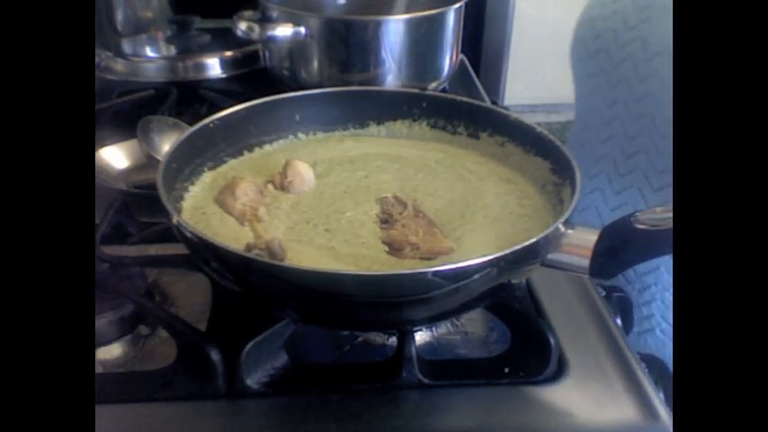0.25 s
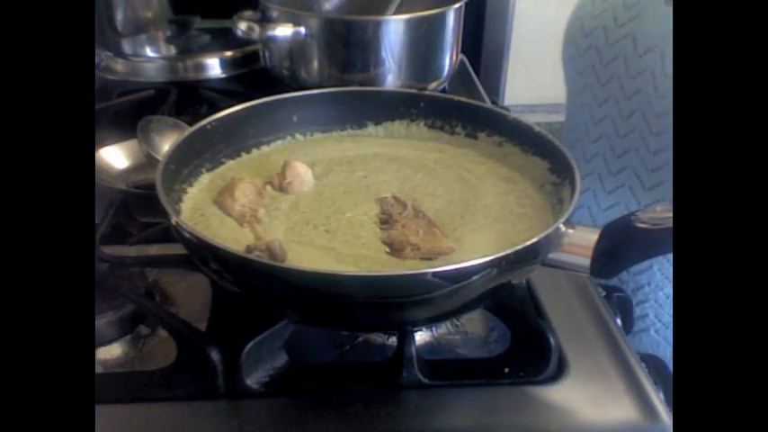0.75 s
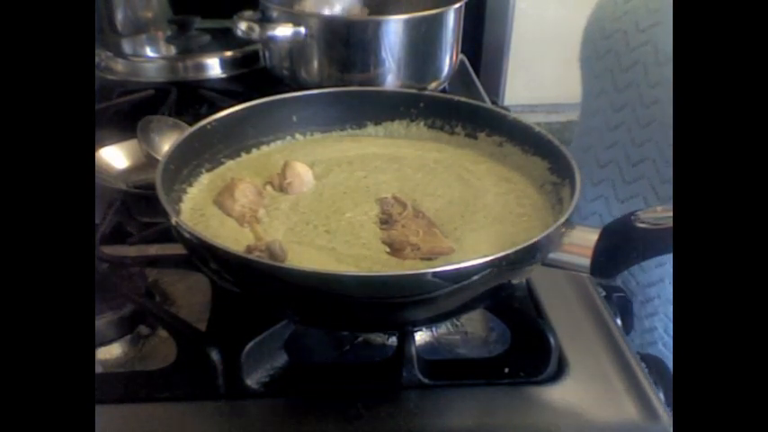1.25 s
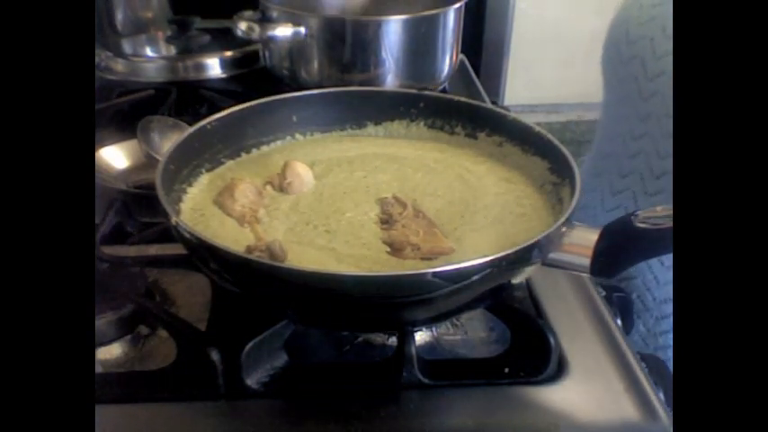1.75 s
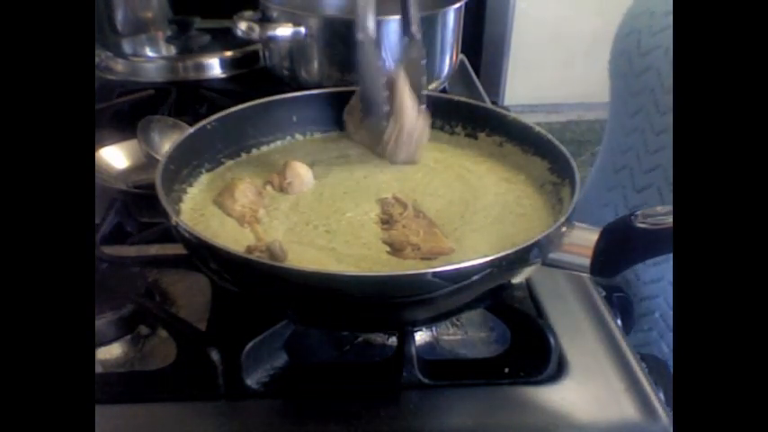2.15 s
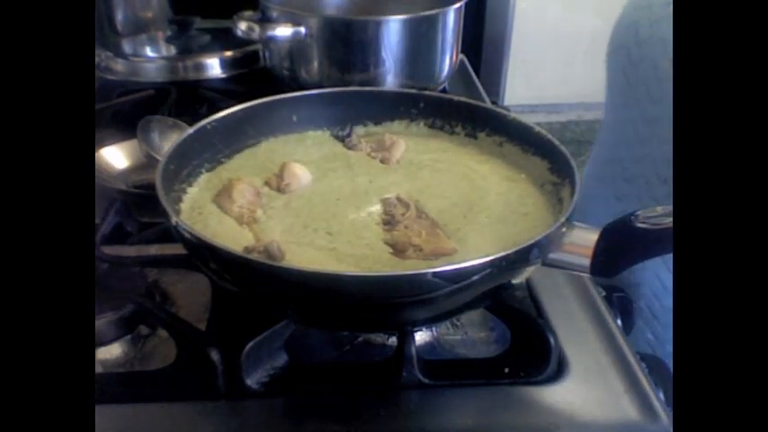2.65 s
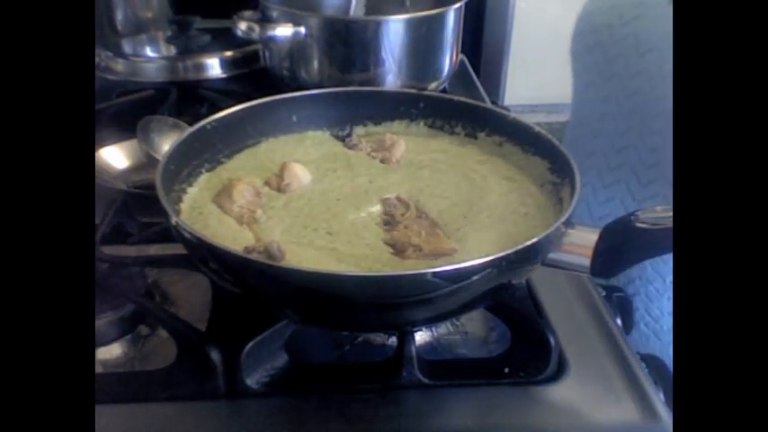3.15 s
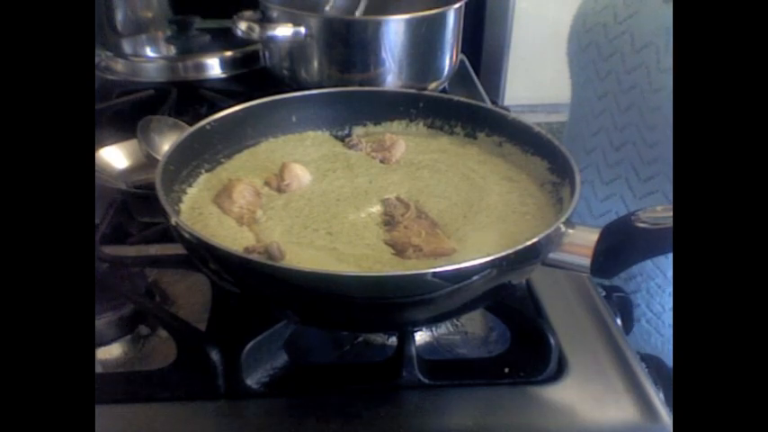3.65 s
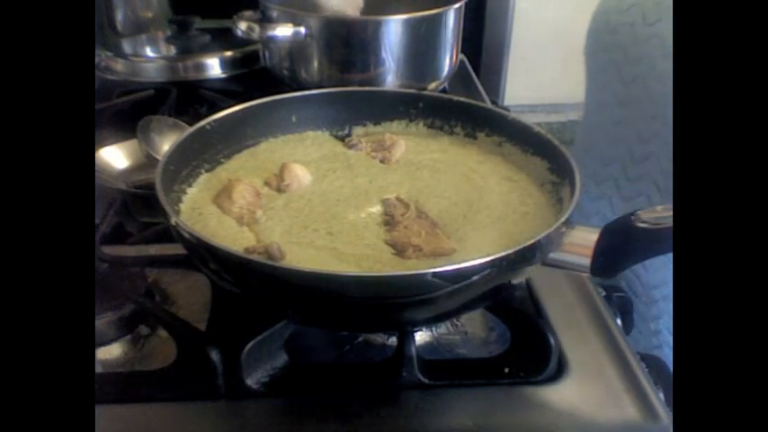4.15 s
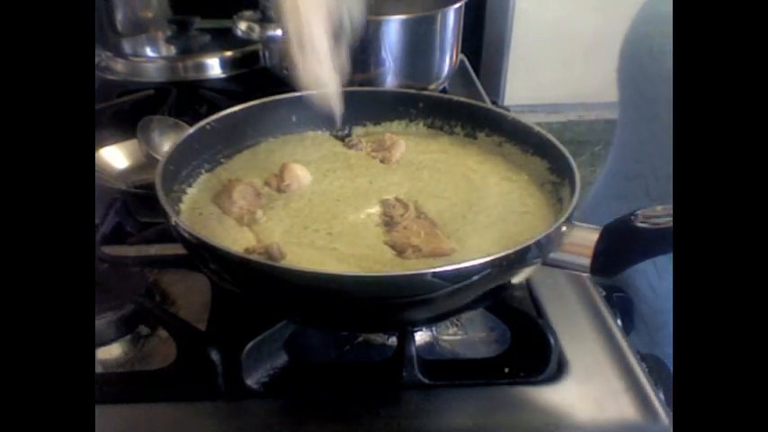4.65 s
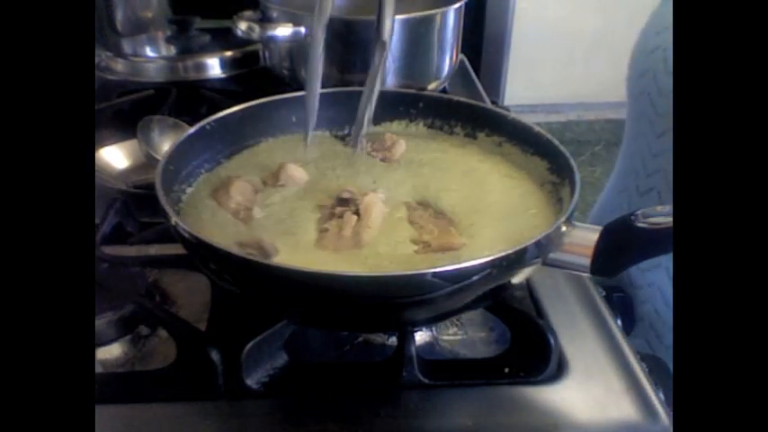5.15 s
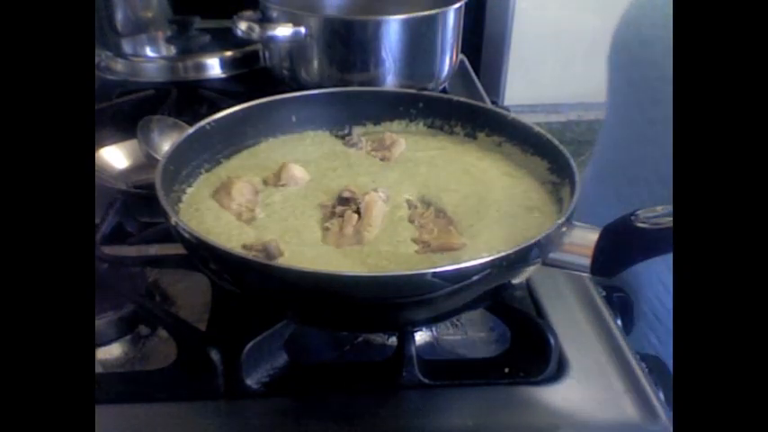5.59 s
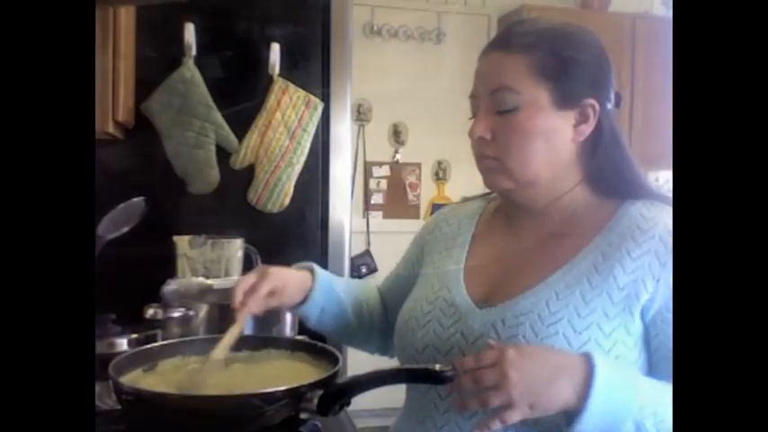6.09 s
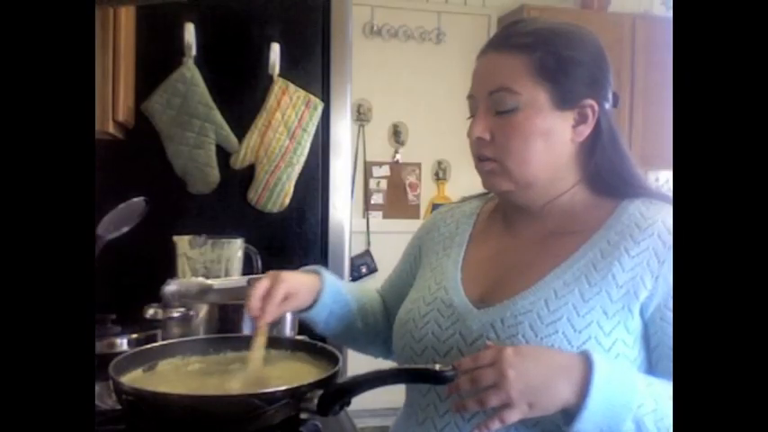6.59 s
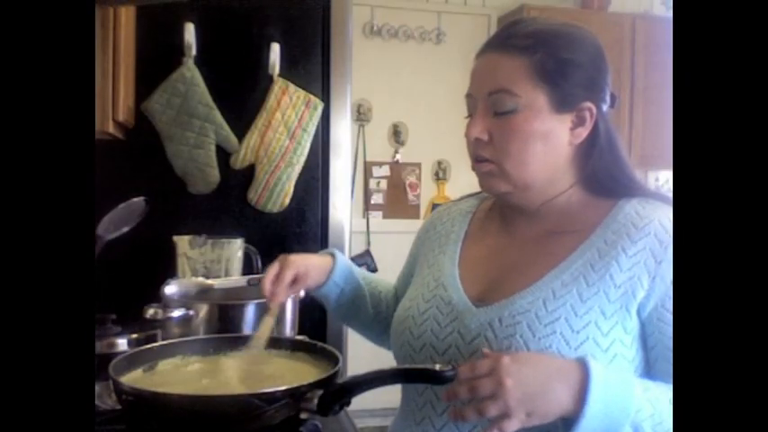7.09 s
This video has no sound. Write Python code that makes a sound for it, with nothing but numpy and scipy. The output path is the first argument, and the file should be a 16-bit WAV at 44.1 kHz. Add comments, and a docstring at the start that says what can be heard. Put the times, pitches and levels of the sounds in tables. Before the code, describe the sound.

A steady low appliance hum and soft room air fill a kitchen, with a thin electronic whine fluttering very fast. Against it, tongs clank on a metal pan with short rings, first with a little scrape, later with a rougher one and several light touches. Dull bumps and tiny ticks fill the gaps. Near the end two clanks fall as the background cross-fades to a heavier hum, leaving faint knocks.

```python
"""In a kitchen, appliance hum, room air and a camera whine that pulses once a frame run throughout.
A soft knock, then metal tongs hit a pan, scrape it and touch it lightly; tiny ticks and knocks follow.
At 3 s comes another blow with a longer scrape, then a tap on a dish, more soft knocks and more ticks.
Near 6 s two blows fall while the sound cross-fades to a second camera position with a stronger low hum;
two soft knocks follow. Hum and whine are sine tones, air and scrapes shaped noise, the pan ringing tones."""
import sys
import numpy as np
from scipy import signal
from scipy.fft import rfft, irfft, next_fast_len
from scipy.io import wavfile
from scipy.ndimage import uniform_filter1d, map_coordinates

SR = 44100
rng = np.random.default_rng(int(sys.argv[2]) if len(sys.argv) > 2 else 0)


def output_pcm(signal):
    """Save a mono or channel-first signal as 16-bit PCM at the path in sys.argv[1].

    Samples are clipped to [-1, 1] before scaling.
    """
    pcm = np.clip(np.atleast_2d(signal).T, -1, 1) * 32767
    wavfile.write(sys.argv[1], SR, np.round(pcm).astype(np.int16))


N = 323253

# The tones (modes) at which the pan can ring. Each row: pitch in Hz, time to fall by 60 dB in seconds,
# then the relative level in dB when struck at spot 0, 1, 2 and 3.
PAN_MODES = [(331, 0.55, -4, -6.5, 2, -9.5), (371, 0.94, -11.5, -18, 0, -45), (544.5, 0.49, -2, 0, 3, -19),
             (630, 0.51, -5.5, -3, -7, -18), (723, 0.58, 5, -3.5, -12.5, -18),
             (1025, 1, -14, -27, -35, -18.5), (1253, 0.56, -0.5, -1, -8, -3.5), (1297, 1, -9, -15, 1, -8),
             (1420, 0.13, -13, -4, -5, -11), (1464, 0.95, -7, -13, 1.5, -20),
             (1540, 0.63, -17, -34, -18, -13), (1780, 0.68, -28, -16.5, -1, -16),
             (1908, 0.31, -17, -38, -14, -9.5), (2006, 0.79, -11, -17, -5.5, -18),
             (2290, 0.76, -17, -12, -22.5, -25), (2400, 0.36, -38, -13, -22, -4.5),
             (2440, 0.31, -28, -22, -26, -15), (2686, 0.25, -16, -32, -21, -37),
             (2840, 0.2, -31, -32, -39, -26), (3005, 0.42, -13, -10.5, -30, -8),
             (3280, 0.4, -29, -18, -25, -13), (3390, 0.64, -17, -26, -13, -37),
             (3430, 0.11, -32, -24, -15, -35), (3640, 0.12, -14, -21, -29, -31),
             (3820, 0.3, -14, -27, -19.5, -9), (3980, 0.13, -22, -27, -26, -28),
             (4180, 0.33, -20, -31, -24, -7.5), (4760, 0.35, -21, -32, -30, -3),
             (5360, 0.23, -25, -24, -23, -5), (5840, 0.25, -29, -28, -14, -41),
             (6450, 0.36, -23, -26, -33, -8), (6650, 0.16, -13.5, -20, -11.5, -15)]


def amp(db):
    """Turns decibels into a plain multiplier."""
    return 10 ** (np.asarray(db) / 20)


def unit(x):
    """Scales a sound to an rms level of 1."""
    return x / np.sqrt(np.mean(x ** 2) + 1e-20)


def along(points, hz):
    """Reads a curve of (Hz, value) points at any pitch, on a logarithmic pitch axis."""
    f, value = np.transpose(points)
    return np.interp(np.log(hz + 1), np.log(f + 1), value)


def filtered(x, response):
    """Multiplies the spectrum of x by a response that depends on frequency."""
    n = x.shape[-1]
    padded = next_fast_len(n + SR // 4)  # spare room, so that the end does not wrap to the start
    spectrum = rfft(x, padded) * response(np.fft.rfftfreq(padded, 1 / SR))
    return irfft(spectrum, padded)[..., :n]


def resonance(f, hz, width_hz):
    """The response of one resonator: a peak of gain 1 at hz that only reacts after it is pushed."""
    return 1j * f * width_hz / (hz * hz - f * f + 1j * f * width_hz)


def wobble(rate):
    """A smooth random curve through `rate` random points a second."""
    knots = rng.standard_normal(int(N * rate / SR) + 4)
    return map_coordinates(knots, [np.arange(N) * rate / SR])


def add(track, s, sound):
    """Mixes a sound into the track at s seconds."""
    part = track[round(s * SR):][:len(sound)]
    part += sound[:len(part)]


def hum(later):
    """Appliance hum: sine tones that waver in pitch and level; `later` (0 to 1) fades their levels over."""
    # Each row: pitch in Hz, level in dB at the first position, at the second, typical pitch wander in Hz.
    hum_lines = [(90.1, -44.5, -37, 0.57), (119.9, -56.5, -51.5, 0.47), (184.2, -62, -62.5, 1.85),
                 (212.2, -55, -53, 2.07), (256.6, -78, -71, 0.39), (275.5, -60.5, -66, 0.954),
                 (423.5, -64.5, -82, 2.13), (481, -82, -84, 3.3), (553, -57, -68, 1.5),
                 (804, -76, -69, 0.94), (1005, -73.5, -84, 2.98), (1182, -72, -70, 2.56)]
    total = np.zeros(N)
    for hz, first_db, second_db, wander_hz in hum_lines:
        level = (1 - later) * amp(first_db) + later * amp(second_db)
        unsteady = amp(0.66 * wobble(2.87))
        turns = np.cumsum(hz + wander_hz * wobble(1.5)) / SR
        tone = np.sin(2 * np.pi * turns + rng.uniform(0, 2 * np.pi))
        total += np.sqrt(2) * level * unsteady * tone
    return total


def room_air(place):
    """The kitchen's steady rush: noise with the colour of one position, slowly varying in level."""
    # The colour of the air, one list for each position. Each row: frequency in Hz, relative level in dB.
    air_colours = [
        [(15, -30), (35, -14), (60, -2.5), (80, -1), (160, 1.5), (350, -0.5), (600, -4.5), (1200, -12.5),
         (1900, -19), (2900, -17), (3600, -23), (7000, -26.5), (13000, -30), (16300, -34.5)],
        [(15, -43), (35, -14), (60, -2), (80, -13), (200, 1.5), (350, -4.5), (700, -6.5), (1300, -9),
         (1900, -16.5), (2900, -16), (3600, -19), (7000, -28.5), (13000, -31.5), (16300, -35)],
    ]
    # The average level in dB at each position.
    air_levels = [-51, -50.5]
    noise = rng.standard_normal(N)
    air = unit(filtered(noise, lambda f: amp(along(air_colours[place], f))))
    return amp(air_levels[place] + 0.39 * wobble(3.89)) * air


def frame_whine(place):
    """Leaking camera electronics: two tones and fuzzy noise bands, switched on for part of each frame."""
    # Each row is one position: time at which one pulse starts, in seconds, frame period in seconds,
    # time switched on in seconds.
    frame_times = [(.0185, .050044, .033), (6.4643, .0417, .0318)]
    # Each row is one position: the pitches of its two tones in Hz.
    whine_pitches = [(8000, 4955), (8000, 4964)]
    # Each row is one position: the rms levels of those two tones in dB while on.
    whine_levels = [(-60.5, -74), (-60, -75)]
    # Each row: band centre in Hz, width in Hz, rms level in dB while on.
    fuzz_bands = [(4910, 110, -82), (9300, 1800, -71.5), (9790, 190, -77.5), (12960, 80, -81)]
    t = np.arange(N) / SR
    pulse_start, period, on = frame_times[place]
    gate = uniform_filter1d(1. * ((t - pulse_start) % period < on), size=20)  # softened edges
    leak = np.zeros(N)
    for hz, db in zip(whine_pitches[place], whine_levels[place]):
        leak += np.sqrt(2) * amp(db) * np.sin(2 * np.pi * hz * t)
    for hz, width_hz, db in fuzz_bands:
        noise = rng.standard_normal(N)
        leak += amp(db) * unit(filtered(noise, lambda f: resonance(f, hz, width_hz) ** 2))
    return gate * leak


def background(place):
    """Room air and the frame whine at one position (0 or 1)."""
    return room_air(place) + frame_whine(place)


def tail():
    """The kitchen's answer to a click: noise in which each frequency dies at its own speed."""
    # Each row: frequency in Hz, time to fall by 60 dB in seconds.
    echo_times = [(200, 0.53), (530, 0.79), (1390, 0.54), (3680, 0.47), (9700, 0.27)]
    hz, t, grid = signal.stft(rng.standard_normal(SR // 2), SR, nperseg=256)
    fading = grid * amp(-60 * t / along(echo_times, hz)[:, None])
    answer = signal.istft(fading, SR, nperseg=256)[1][:SR // 2]
    return answer / np.linalg.norm(answer)


def room(x):
    """The sound x as the walls return it, 150 samples late at the earliest."""
    return signal.fftconvolve(np.pad(x, (150, 0)), tail())[:len(x)]


def ticks():
    """Tiny ticks: a few milliseconds of noise around one centre frequency."""
    # Each row: start in seconds, peak level in dB, centre in Hz, width as a share of the centre.
    tick_list = [(1.7235, -45, 3980, 1.2), (1.732, -38, 12500, 0.78), (1.7395, -46, 10500, .4),
                 (1.8245, -49, 14000, .6), (2.0757, -51, 5000, .5), (2.1525, -49, 11000, 1.2),
                 (2.163, -50, 13500, .6), (2.1954, -39.5, 6000, 2.9), (2.2265, -40, 4870, 1.6),
                 (4.7496, -44, 3450, 0.6), (4.962, -41, 5000, 1.5), (5.0494, -49, 10000, .5),
                 (5.1326, -48, 3160, 0.43)]
    out, t = np.zeros(N), np.arange(SR // 40) / SR
    for s, db, hz, share in tick_list:
        burst = rng.standard_normal(len(t)) * amp(-60 * t / .008)
        tick = filtered(burst, lambda f: resonance(f, hz, share * hz) ** 3)
        add(out, s, amp(db) * tick / np.abs(tick).max())
    return out


def knocks():
    """Padded contacts: one push and a dull puff of noise sound a short mode and a low body."""
    # Each row: start in seconds, peak level in dB, pitch in Hz, gain of the low body in dB.
    knock_list = [(0.248, -30.5, 1060, 6), (.269, -40, 1050, -12), (.29, -42, 560, -8),
                  (2.709, -45, 465, -8), (2.865, -33, 340, -5), (2.889, -34, 400, -2),
                  (2.940, -31, 1060, 4), (2.961, -43, 1070, -10), (4.289, -49, 1280, -14),
                  (4.429, -36, 1300, -3), (6.229, -39.5, 610, 3), (6.909, -47, 620, -16)]
    puff_t60 = .11  # seconds for the puff to fall by 60 dB
    out, t = np.zeros(N), np.arange(SR // 5) / SR
    for s, db, hz, body_db in knock_list:
        puff = rng.standard_normal(len(t)) * amp(-60 * t / puff_t60) * (1 - np.exp(-t / .001))
        puff[20] += 14  # the first push
        shape = lambda f: resonance(f, hz, 210) ** 2 + amp(body_db) * resonance(f, 430, 590) ** 3
        dull = filtered(puff, shape)
        add(out, s, amp(db) * dull / np.abs(dull).max())
    return out


def cluster(hz, t):
    """An uneven pan splits every mode: each tone gets four close neighbours that beat with it."""
    split, phase = rng.standard_normal((2, 4, len(hz), 1))
    split, phase = .009 * split, np.pi * phase
    neighbours = np.sin(2 * np.pi * hz * (1 + split) * t + phase).sum(axis=0)
    return np.sin(2 * np.pi * hz * t) + .5 * neighbours


def ping(hz, db, t60, tick_db):
    """A thin tick of noise, while the given modes ring shortly."""
    t = np.arange(SR // 6) / SR
    rings = (amp(db - 60 * t / t60) * cluster(hz, t)).sum(axis=0)
    tick = rng.standard_normal(len(t)) * amp(tick_db - 60 * t / 0.067)
    return rings * (1 - np.exp(-t / 0.0043)) + filtered(tick, lambda f: resonance(f, 3400, 4100))


def touches():
    """Each light touch wakes the pan modes near one pitch, the others faintly; one tap lands on a dish."""
    # Each row: start in seconds, level in dB, pitch in Hz that is woken most, relative tick level in dB.
    touch_list = [(0.975, -40, 1630, -15), (3.135, -45.5, 5280, -13), (3.201, -41.5, 3000, -13),
                  (3.226, -33, 1280, -18), (3.274, -41.5, 3310, 4), (3.33, -39, 2450, -2),
                  (3.352, -32, 670, -17), (3.373, -51, 2430, -11), (3.398, -53, 2430, -5)]
    # The tap on the dish: start in seconds, level in dB, relative tick level in dB.
    dish_tap = (4.030, -46.5, 4.7)
    # The modes of the dish. Each row: pitch in Hz, relative level in dB, time to fall by 60 dB in seconds.
    dish_modes = [(1330, -1, .07), (1987, 0.5, .11), (3270, -11, .06), (4150, -7, .075), (4960, -5, .06),
                  (6815, -6, .06)]
    touch_t60 = .075  # seconds
    near_db, rest_db = 60, -20  # fall per octave away from the pitch; typical level of the other modes
    out, hz = np.zeros(N), np.transpose(PAN_MODES)[0][:, None]
    for s, db, centre_hz, tick_db in touch_list:
        octaves = abs(np.log2(hz / centre_hz))
        faint_db = rest_db + 4 * rng.standard_normal(hz.shape) - 3.7 * octaves
        woken_db = np.maximum(-near_db * octaves, faint_db)
        add(out, s, amp(db) * ping(hz, woken_db, touch_t60, tick_db))
    s, db, tick_db = dish_tap
    add(out, s, amp(db) * ping(*np.transpose(dish_modes)[:, :, None], tick_db))
    return out


def drag():
    """Tongs scraping the pan: lumpy noise from rough contact, partly bare, partly through the pan's modes."""
    # Two strokes, each a list of points. Each row: time in seconds, level in dB.
    strokes = [
        [(.8, -55), (.85, -55.5), (.9, -48.5), (.915, -52), (.96, -64), (1.0, -68)],
        [(3.1, -83), (3.16, -54), (3.24, -44.5), (3.275, -43.5), (3.32, -50.5), (3.35, -41.5), (3.41, -60),
         (3.49, -78)],
    ]
    # The treble gain of each stroke in dB.
    treble_gains = [-8, 1.5]
    # The colour of the bare scrape. Each row: frequency in Hz, relative level in dB.
    rasp_colour = [(240, -38.5), (400, -6), (687, -1.5), (935, -12), (1290, -4), (1870, -13), (2360, -13),
                   (2800, -22), (5270, -11.5), (16000, -35)]
    t = np.arange(N) / SR
    lumpy = rng.standard_normal(N) * amp(3.2 * wobble(130))
    rasp = filtered(lumpy, lambda f: amp(along(rasp_colour, f)))
    sung = filtered(rasp, lambda f: sum(resonance(f, m[0], 0.0093 * m[0]) for m in PAN_MODES))
    contact = unit(unit(rasp) + .8 * unit(sung))
    treble = filtered(contact, lambda f: f / (f + 4000))
    out = np.zeros(N)
    for stroke, treble_db in zip(strokes, treble_gains):
        level_db = np.interp(t, *np.transpose(stroke), left=-120, right=-120)
        out += amp(level_db) * (contact + (amp(treble_db) - 1) * treble)
    return out


def blows():
    """Each blow rattles briefly in noise coloured by its spot, and rings the modes that the spot excites."""
    # Each blow falls on the next spot. Each row: start in seconds, level in dB, treble tilt in dB per octave,
    # ring level in dB, share of the free ring time, room level in dB, rise time in seconds.
    blow_list = [(0.555, -8, 0.15, -24, 0.5, -7, 0.00083), (3.06, -10.5, -0.24, -21, 0.58, -6.5, 0.002),
                 (5.913, -16, -0.2, -25.5, 1, 2, 0.0048), (6.021, -10, 0.4, -17, 0.78, -8, 0.0016)]
    # The shared colour of the clatter. Each row: frequency in Hz, relative level per Hz in dB.
    clatter_colour = [(60, -51.5), (250, -40.5), (570, -41.5), (930, -48.5), (1370, -41), (2060, -51),
                      (2830, -58.5), (3800, -50.5), (5700, -48.5), (8900, -52), (13300, -61), (16000, -71)]
    rattle_t60 = 0.083  # seconds
    spot_share = 0.2  # how far the broad colour follows the struck spot
    out, t = np.zeros(N), np.arange(SR // 2) / SR
    hz, t60, *spots = np.transpose(PAN_MODES)[:, :, None]
    for (s, db, tilt_db, ring_db, free, room_db, rise), level in zip(blow_list, spots):
        # while the tongs touch, the modes are broad humps on the shared colour
        trend = uniform_filter1d(level, size=5, axis=0)
        hump_db = level - trend + spot_share * (trend - trend.mean())
        peaks = lambda f: abs(amp(hump_db) * resonance(f, hz, 0.035 * hz))
        humps = lambda f: np.sqrt(0.23 + 0.36 * np.sum(peaks(f) ** 2, axis=0))
        tilted = lambda f: amp(along(clatter_colour, f) + tilt_db * np.log2((f + 1) / 2000))
        # sqrt(SR / 2) turns a level per Hz into a gain for white noise
        noise = filtered(rng.standard_normal(len(t)), lambda f: tilted(f) * humps(f) * np.sqrt(SR / 2))
        clatter = amp(5.5) * noise * amp(-60 * t / rattle_t60) * (1 - np.exp(-t / rise))
        modes = amp(ring_db + level - 60 * t / (t60 * free)) * cluster(hz, t)
        ring = modes.sum(axis=0) * (1 - np.exp(-t / 0.0023))
        add(out, s, amp(db) * (clatter + amp(room_db) * room(clatter) + ring))
    return out


def scene():
    """Mixes all sources, cross-fading from the first position to the second."""
    # The cross-fade: start in seconds, end in seconds.
    fade = (5.81, 6.253)
    later = np.clip((np.arange(N) / SR - fade[0]) / (fade[1] - fade[0]), 0, 1)
    # the ring of the last blow is cut short as the first position fades out
    struck = blows() * np.sqrt(1 - later)
    small = drag() + touches() + knocks()
    steady = hum(later) + (1 - later) * background(0) + later * background(1)
    mix = struck + small + amp(-5) * room(small) + ticks() + steady
    return np.array([mix, mix])


def record(dry):
    """The right channel is a little louder than the left; a steep cut ends the treble."""
    # Each row: frequency in Hz, left minus right in dB.
    level_offsets = [(60, -1), (380, -.95), (700, -.65), (1300, -.5), (2400, -.3), (5000, -.3),
                     (15000, -.2)]
    top_hz = 16150  # the upper band limit
    channel_gains = lambda hz: amp(np.array([[.5], [-.5]]) * along(level_offsets, hz))
    return filtered(dry, lambda hz: channel_gains(hz) / (1 + (hz / top_hz) ** 120))


dry = scene()
out = record(dry)
output_pcm(out)
```